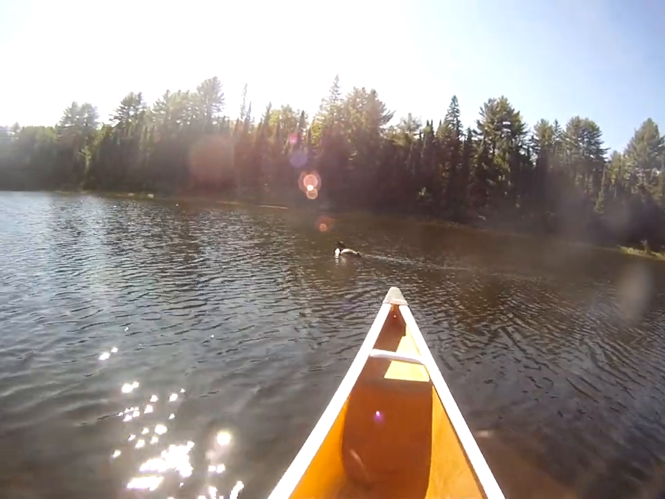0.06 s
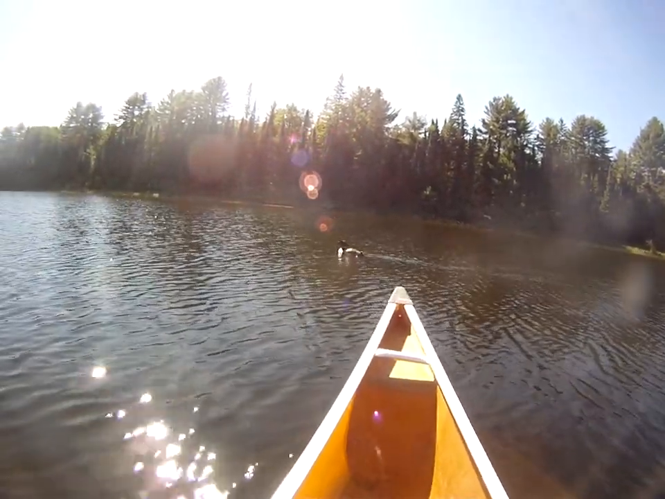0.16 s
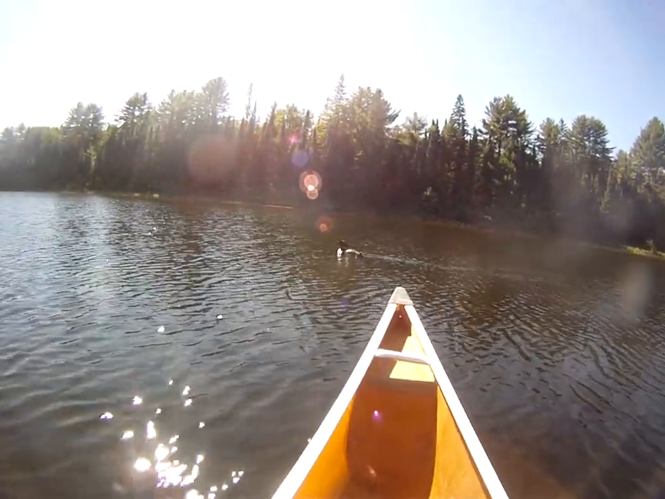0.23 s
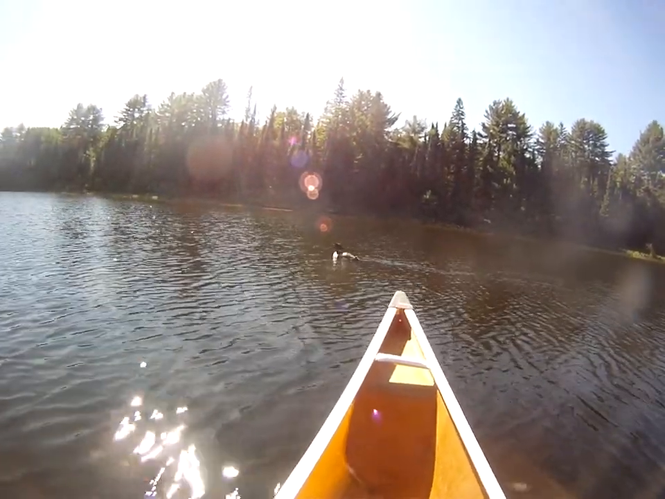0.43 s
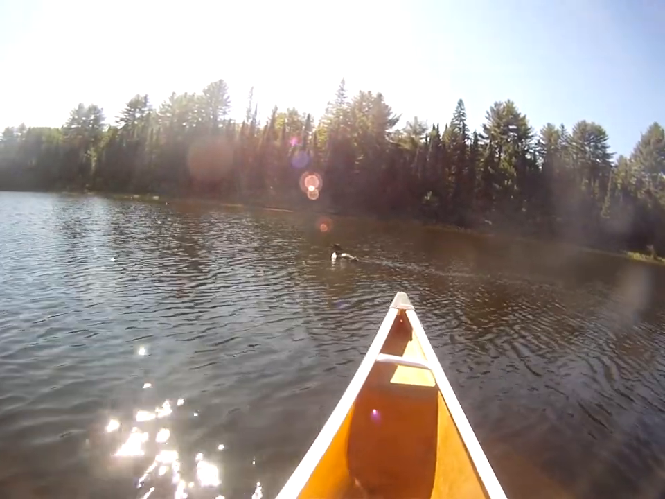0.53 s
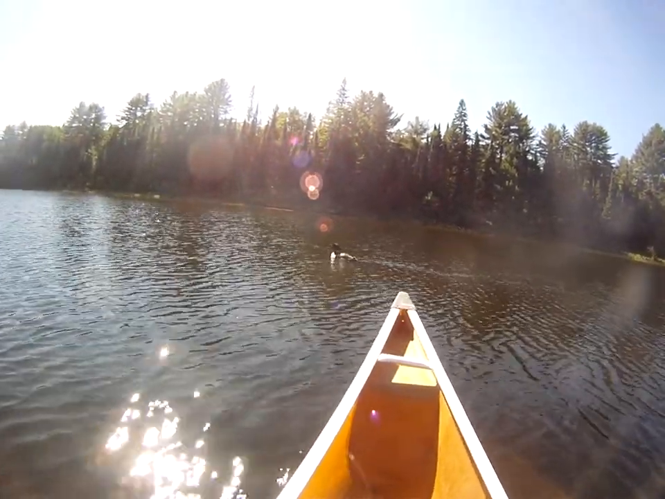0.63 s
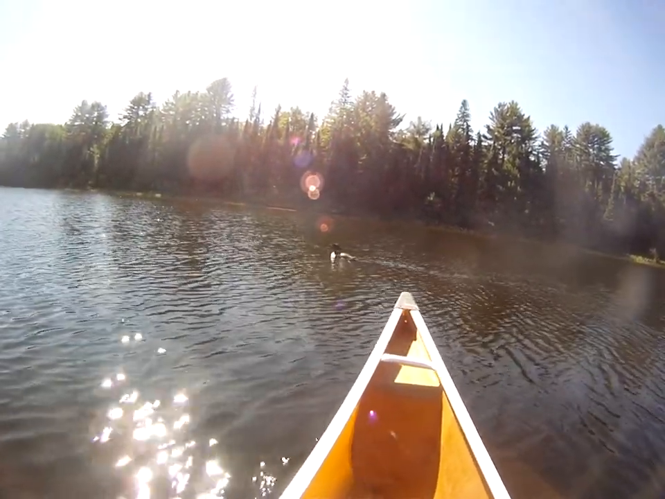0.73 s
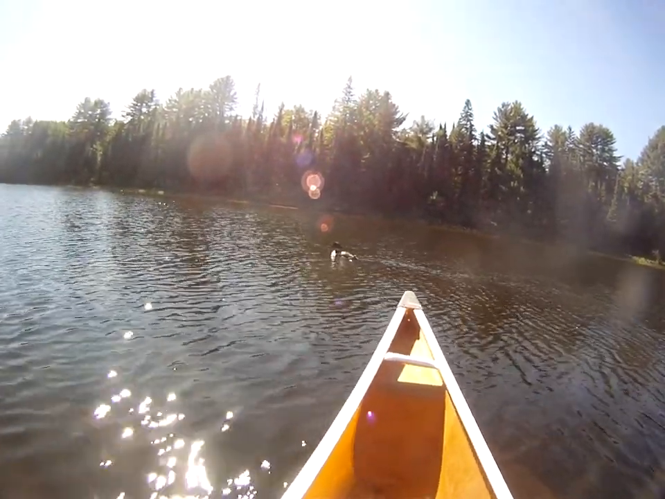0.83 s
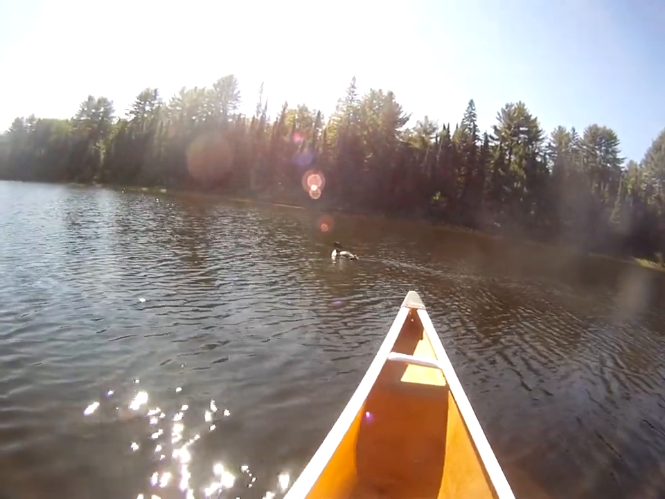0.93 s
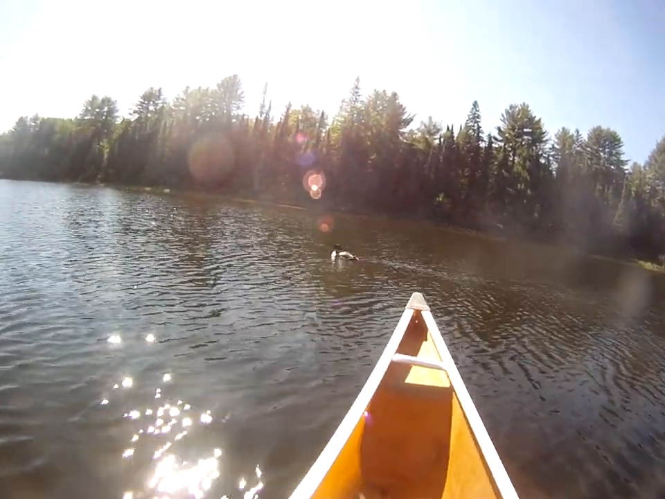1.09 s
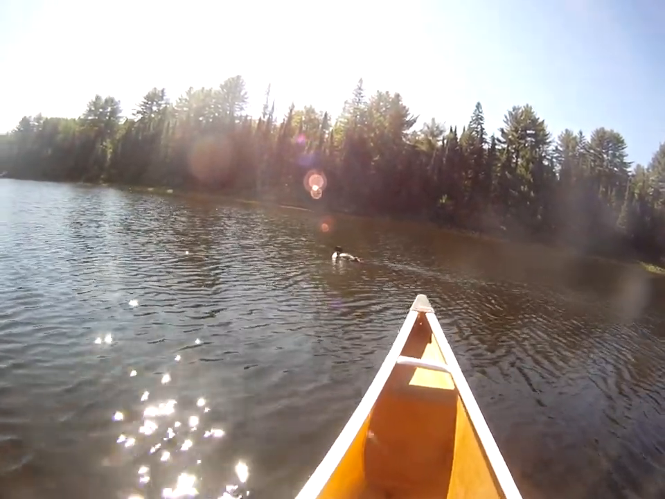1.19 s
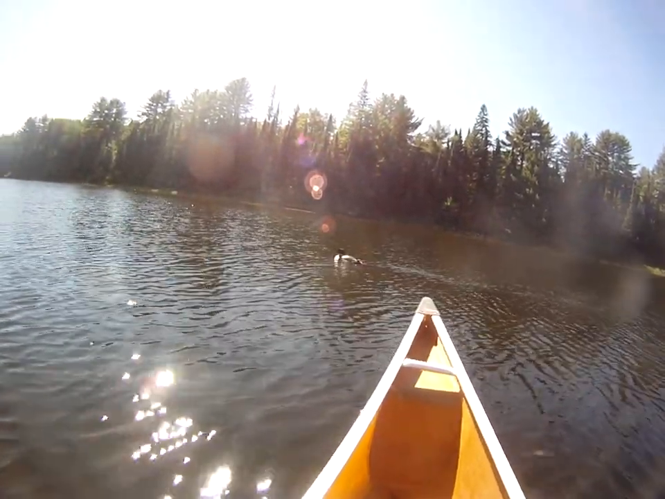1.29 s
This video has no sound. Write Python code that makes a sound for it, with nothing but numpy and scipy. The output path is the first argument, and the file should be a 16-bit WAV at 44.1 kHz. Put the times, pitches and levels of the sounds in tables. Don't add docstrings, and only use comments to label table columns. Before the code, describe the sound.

A loon's clear, hollow wail rises to a held note, breaks suddenly higher, then drops and fades; a faint echo returns from wooded shores, with soft air and water gulping near the microphone on a canoe.

```python
import sys
import numpy as np
from scipy import signal
from scipy.fft import rfft, irfft, next_fast_len
from scipy.io import wavfile
from scipy.ndimage import uniform_filter1d, map_coordinates

SR = 44100
rng = np.random.default_rng(int(sys.argv[2]) if len(sys.argv) > 2 else 0)


def transcribe(signal):
    frames = np.atleast_2d(signal).T
    limited = np.clip(frames, -1, 1)
    pcm = np.round(limited * 32767).astype(np.int16)
    wavfile.write(sys.argv[1], SR, pcm)


def invert_db(x):
    u = np.asarray(x, float) / 20
    return 10 ** u


N = 59535

# frequency [Hz], density [dB per Hz].
AIR_COLOUR = [(65, -39), (110, -6), (533, -12), (845, -19.5), (1160, -20), (5600, -29.5), (7280, -60),
              (12300, -120)]

# frequency [Hz], density [dB per Hz].
RUMBLE_COLOUR = [(8.8, -34.5), (15, -10), (32, -1), (75, -6), (200, -20), (260, -45.5), (440, -120)]

# time [s], level [dB].
BREEZE_LEVEL = [(0, -61), (.2, -59), (.45, -50), (.6, -56), (.75, -60), (.9, -59), (1.1, -59.5),
                (1.35, -62)]

# pitch [Hz], width [Hz], level [dB].
BUBBLE_SIZES = [(2055, 130, -3), (2370, 120, -0.5), (2810, 250, -4), (3410, 53, -7.5), (3990, 110.7, 1)]

# delay [s], level [dB].
BANK_ECHOES = [(.27, -41), (.355, -32.5), (.378, -37), (.41, -36.5), (.462, -38), (.55, -35), (.69, -38.5)]

# time [s], level [dB].
AIR_CARRY = [(.5, -2), (.78, 1), (.9, 2), (.95, -3), (1.0, -10), (1.05, 3), (1.09, -11), (1.14, 0),
             (1.18, -8), (1.22, 1), (1.35, -3)]

# centre [Hz], width [Hz], level under the fundamental [dB].
THROAT_RESONANCES = [(1580, 235, -21), (2433, 90, -35), (3014, 114, -27.5), (3380, 90, -37),
                     (4920, 120, -32.5), (5635, 150, -36.5)]

# time [s], pitch [Hz], level [dB], second partial [dB], mouth opening [dB].
OPENING_RISE = [(0.146, 457.0, -55, -60.5, 3.5), (0.156, 474.2, -43, -43.5, 3),
                (0.17, 501, -39.5, -42, 5.5), (0.2, 550, -33, -47, 1), (0.221, 619, -33, -57, 3)]
LOW_NOTE = [(.229, 701.5, -29, -49, -5.5), (.245, 712, -27.5, -45.5, -3), (.3, 740.1, -25.5, -44, -2.5),
            (.38, 764.6, -23.5, -44.5, -1), (.46, 783.3, -22.5, -42, 4), (.53, 797, -22, -39.5, 0.5),
            (.56, 808, -23, -41, 2.5), (.572, 818.6, -22, -45.5, -2), (.58, 861, -25.5, -46, -0.5)]
HIGH_NOTE = [(0.581, 975, -24, -54.5, -3), (.6, 996, -23, -51.5, 0), (.62, 992.4, -24, -54, 0.5),
             (0.659, 990.5, -24, -53, -1), (0.719, 978.4, -24, -57.5, -1.5),
             (0.779, 963.8, -24.5, -64.5, -2), (.82, 948, -25, -68.5, -9), (.84, 925, -28, -74, -22)]
CLOSING_FALL = [(.842, 733, -27, -48.5, 4), (0.854, 708, -28, -45, -2.5), (0.881, 690.3, -29.5, -46, -2.5),
                (0.916, 658, -32.5, -42, 1.5), (0.937, 622, -36.5, -53, -8), (0.951, 589, -44, -72, -7)]

# start [s], fade in [s], end [s], fade out [s].
NOTE_EDGES = [
    (0.137, 0.01, .5855, 0.0072),
    (.5805, 0.0053, .843, 0.005),
    (0.8391, 0.0041, 0.96, .012),
]

# beat rate [per second], level depth [ratio], phase depth [rad], T60 [s], start phase [rad].
BREAK_BEATS = [
    (240, 0, 0, .1, 0),
    (239.4, .24, -.17, .13, .3),
    (235, .25, .2, 0.072, .3),
]

PARTIAL_LOSS = [
    1.2,
    0.17,
    2.5,
]

# start [s], pitch [Hz], level [dB], length [s].
THROAT_CATCH = [
    (.84, 3100, -60, .018),
    (.841, 5250, -68, .012),
]

TRICKLE_START_S, TRICKLE_RISE_S = 1.15, 0.1


def unit(x):
    return x / np.sqrt(np.mean(x ** 2) + 1e-20)


def wobble(rate):
    knots = rng.standard_normal(int(N * rate / SR) + 4)
    return map_coordinates(knots, [np.arange(N) * rate / SR])


def ramp(u):
    return np.sin(np.pi / 2 * np.clip(u, 0, 1)) ** 2


def filtered(x, response):
    m = next_fast_len(N + SR // 2)
    return irfft(rfft(x, m) * response(np.fft.rfftfreq(m, 1 / SR)), m)[..., :N]


def hiss(points):
    f, db = np.transpose(points)
    noise = rng.standard_normal(N)
    return unit(filtered(noise, lambda hz: invert_db(np.interp(np.log(hz + 1), np.log(f + 1), db))))


def lake():
    s, db = np.transpose(BREEZE_LEVEL)
    breeze = invert_db(np.interp(np.arange(N) / SR, s, db) + 1.2 * wobble(7.5) - 2.5)
    air = invert_db(-60) * invert_db(0.6 * wobble(6))
    return air * hiss(AIR_COLOUR) + breeze * hiss(RUMBLE_COLOUR)


def bubbles(count, hz, spread, cycles):
    row = rng.random((count, 2))
    u = np.arange(1500) / SR
    pitch = hz * np.exp(spread * rng.standard_normal((count, 1)))
    at = TRICKLE_START_S + (N / SR - TRICKLE_START_S) * row[:, :1]
    size = invert_db(-2 * np.log(row[:, 1:] + 0.0013))
    size = size * np.clip((at - TRICKLE_START_S) / TRICKLE_RISE_S, 0.1, 1)
    life = u * pitch / cycles
    ring = np.sin(2 * np.pi * pitch * u * (1 + 0.02 * life))
    grain = size * life * np.exp(-3 * life) * ring
    place = (at * SR).astype(int) + np.arange(len(u))
    out = np.bincount(place.ravel(), grain.ravel(), N + len(u))[:N]
    return out / np.std(out[-SR // 8:])


def gulp():
    start_s, length_s = 1.23, 0.05
    from_hz, to_hz = 315, 205
    u = np.clip((np.arange(N) / SR - start_s) / length_s, 0, 1)
    turn = 2 * np.pi * np.cumsum(from_hz + (to_hz - from_hz) * u) / SR
    level = invert_db(-47 + 1.6 * wobble(90.6)) * np.sin(np.pi * u)
    second_mode = 0.7 * (1 - u) * np.sin(1.35 * turn)
    splash = 0.3 * wobble(1100)
    return level * (np.sin(turn) + second_mode + splash)


def hull():
    favoured = sum(invert_db(db) * bubbles(count=60, hz=hz, spread=1.5 * width / hz, cycles=30)
                   for hz, width, db in BUBBLE_SIZES)
    trickle = 0.55 * favoured + bubbles(count=500, hz=2800, spread=0.45, cycles=5.6)
    laps = bubbles(count=40, hz=508, spread=0.55, cycles=6)
    return gulp() + invert_db(-68) * trickle + invert_db(-65) * laps


def shores(call):
    t = np.arange(N) / SR
    scatter_t60, woods = 0.0037, (0.14, -38, 1.4)
    reply = np.zeros(N)
    for s, db, t60 in [(s, db, scatter_t60) for s, db in BANK_ECHOES] + [woods]:
        burst = (t > s) * invert_db(-60 * np.abs(t - s) / t60) * rng.standard_normal(N)
        reply += invert_db(db) * burst / np.linalg.norm(burst)
    answer = signal.fftconvolve(call, reply)[:N]
    dull = filtered(answer, lambda hz: 1 / (1 + (hz / 1490) ** 2))
    return invert_db(np.interp(t, *np.transpose(AIR_CARRY))) * dull


def throat(hz):
    return invert_db(-57.5) + sum(invert_db(db) / (1 + ((hz - centre) / width) ** 2)
                            for centre, width, db in THROAT_RESONANCES)


def note(rows, edge, beat, loss_db):
    jitter_hz, shimmer_db = 0.98, -0.22
    brightens, loud_db = 0.87, -22
    t = np.arange(N) / SR
    s, *columns = np.transpose(rows)
    hz, db, second_db, open_db = [uniform_filter1d(np.interp(t, s, c), size=250) for c in columns]
    start, fade_in, end, fade_out = edge
    rate, depth, swing, t60, phase = beat

    u = np.maximum(t - start, 0)
    dying = invert_db(-60 * u / t60)
    cycle = 2 * np.pi * rate * u + phase
    turn = 2 * np.pi * np.cumsum(hz + jitter_hz * wobble(60)) / SR + swing * dying * np.sin(cycle)

    upper = sum(throat(k * hz) * invert_db(-loss_db * (k - 3)) * np.sin(k * turn) for k in range(3, 9))
    effort = invert_db(open_db + brightens * (db - loud_db))
    voice = invert_db(db) * (np.sin(turn) + effort * upper)
    voice = voice + invert_db(second_db) * np.cos(2 * turn)
    gate = ramp((t - start) / fade_in) * ramp((end - t) / fade_out)
    gate = gate * (1 + depth * dying * np.cos(cycle))
    return np.sqrt(2) * gate * invert_db(shimmer_db * wobble(40)) * voice


def catch():
    t = np.arange(N) / SR
    return sum(invert_db(db) * np.sin(np.pi * np.clip((t - s) / length, 0, 1)) * np.sin(2 * np.pi * hz * t)
               for s, hz, db, length in THROAT_CATCH)


def loon():
    registers = (OPENING_RISE + LOW_NOTE, HIGH_NOTE, CLOSING_FALL)
    parts = zip(registers, NOTE_EDGES, BREAK_BEATS, PARTIAL_LOSS)
    return catch() + sum(note(*part) for part in parts)


def scene():
    call = loon()
    around = filtered(hull() + lake(), lambda hz: 1 / (1 + (hz / 5650) ** 30))
    return (call + shores(call) + around)[None]


def low_pass(x):
    return signal.sosfilt(signal.butter(12, 15270, fs=SR, output="sos"), x)


def record(dry):
    rate, hold, top_hz = 12000, 4, 15280
    fine = signal.resample(dry, N * rate * hold // SR, axis=1)
    held = np.repeat(fine[:, ::hold], hold, axis=1)
    mix = filtered(signal.resample(held, N, axis=1), lambda hz: hz < top_hz)
    return low_pass(mix)


dry = scene()
out = record(dry)
transcribe(out)
```